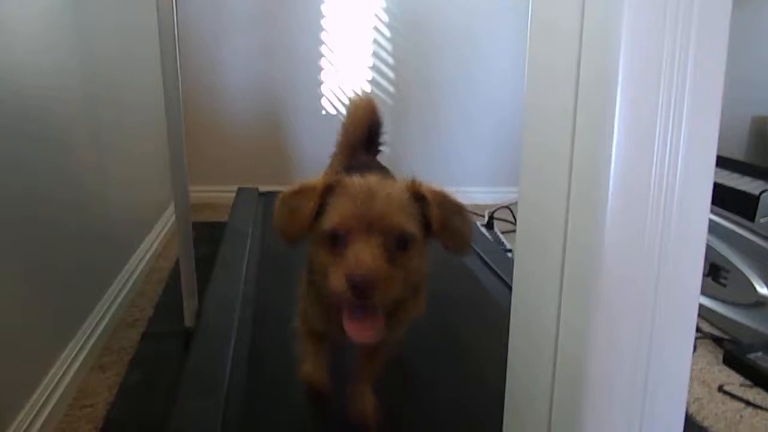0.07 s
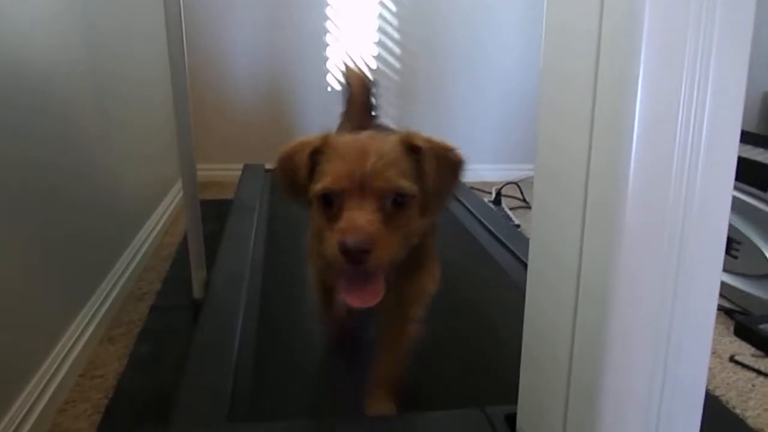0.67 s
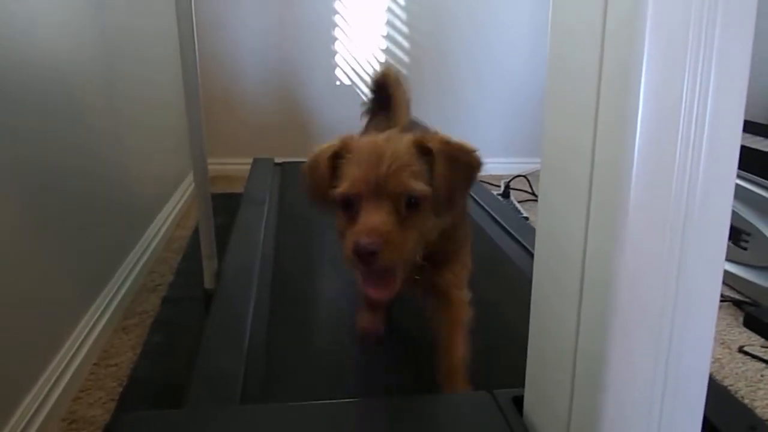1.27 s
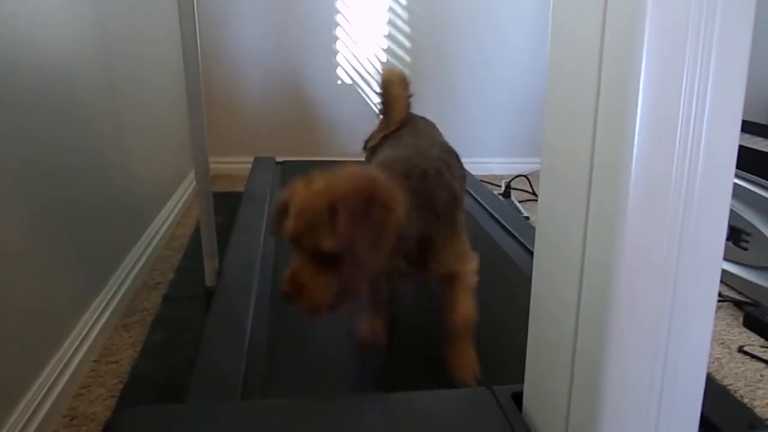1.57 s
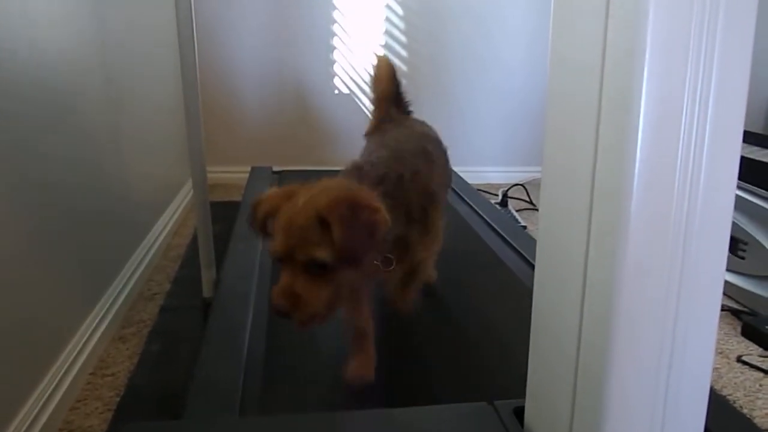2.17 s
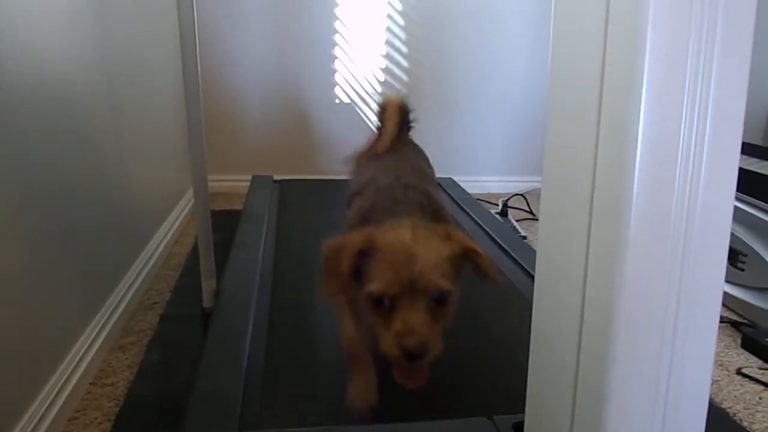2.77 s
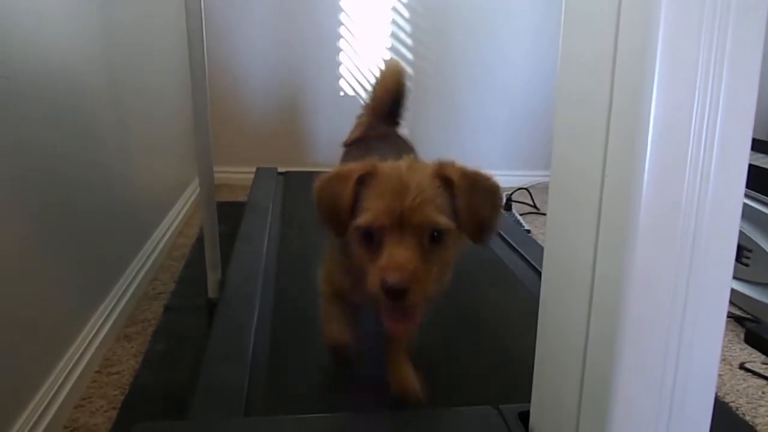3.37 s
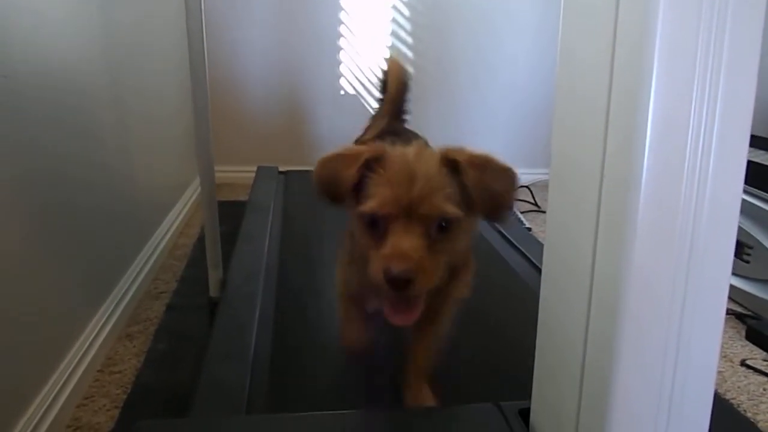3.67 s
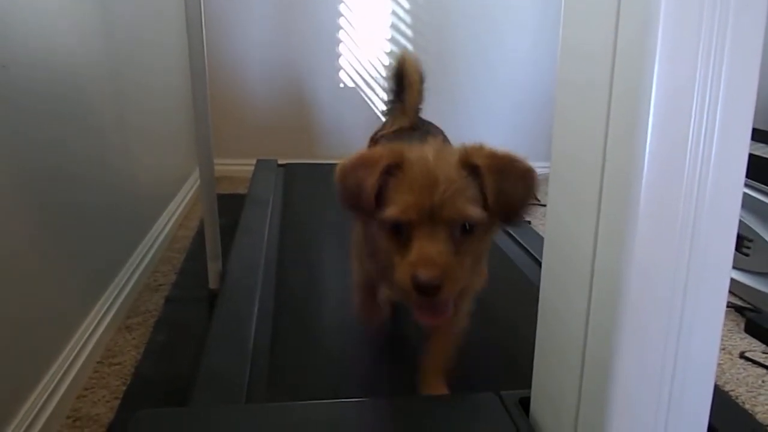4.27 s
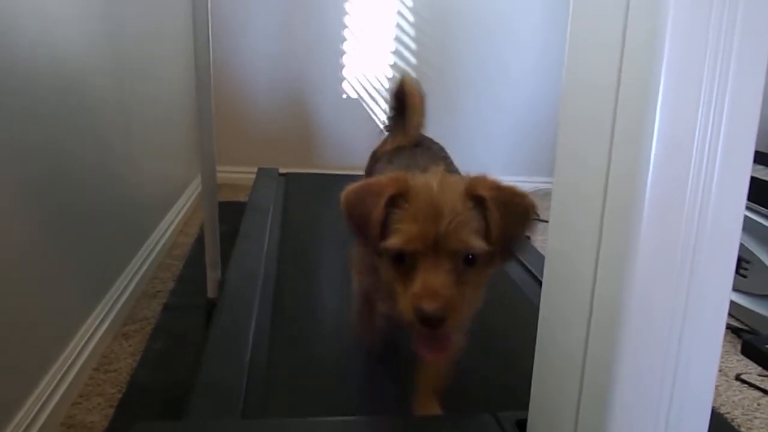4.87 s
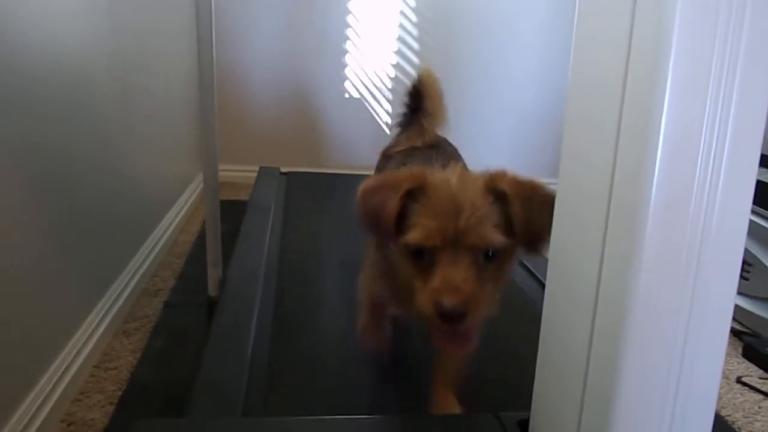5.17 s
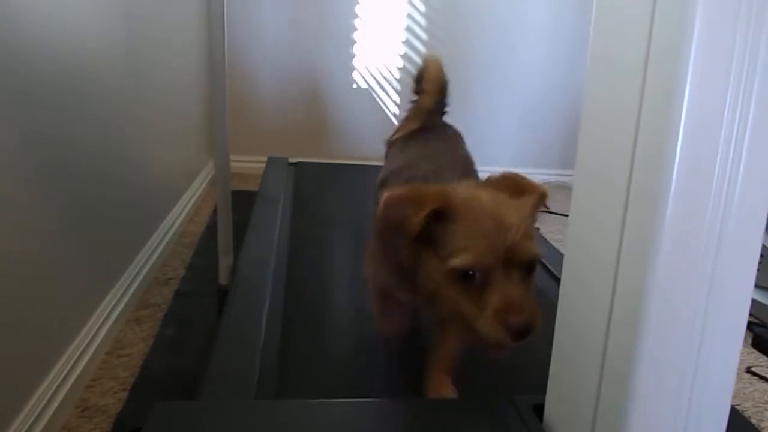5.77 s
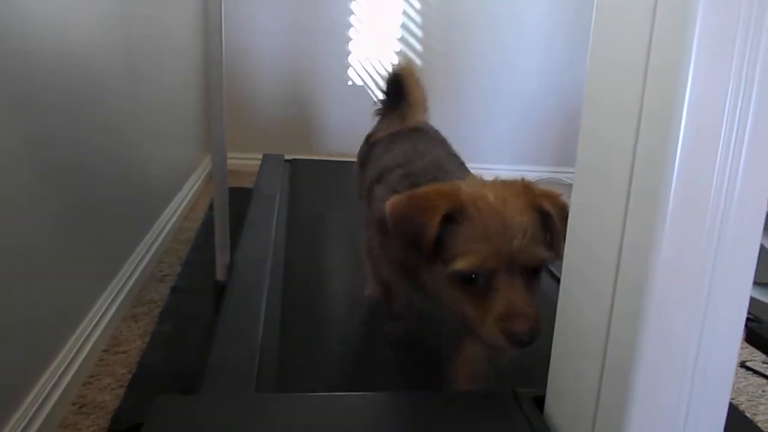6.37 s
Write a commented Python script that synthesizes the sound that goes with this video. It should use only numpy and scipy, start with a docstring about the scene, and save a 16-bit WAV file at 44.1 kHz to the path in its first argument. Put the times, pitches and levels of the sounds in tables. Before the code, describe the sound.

A small dog trots on a treadmill in the corner of a room, heard close up in stereo. The machine starts abruptly out of a short silence and runs steadily, with a low belt rumble, a motor hum, a hiss and a thin wavering whine. Light, slightly uneven paw pats, scuffs and claw ticks carry on throughout. Collar tags jingle at intervals, loudest near the end, and the deck thumps dully once midway and twice later.

```python
"""A small dog trots on a treadmill in a corner of a room, close to a stereo microphone.
After half a second of silence, the sound opens on the running machine: the belt rumbles over the deck,
the motor hums, its brushes hiss and its drive whines in step with the shaft. From then on paws pat and
scuff the belt, claws tick, and metal collar tags clink now and then. The deck gives a dull thump near
2.7 s and two more just after 5 s. The loudest clink comes near 6 s, shortly before the end."""
import sys
import numpy as np
from scipy import signal
from scipy.fft import rfft, irfft
from scipy.io import wavfile
from scipy.ndimage import uniform_filter1d, map_coordinates

SR = 44100
rng = np.random.default_rng(int(sys.argv[2]) if len(sys.argv) > 2 else 0)


def persist_wave(psi):
    """Save psi, clipped to +-1, as 16-bit WAV."""
    counts = np.round(np.clip(psi, -1, 1) * 32767).astype(np.int16)
    wavfile.write(sys.argv[1], SR, np.atleast_2d(counts).T)


N = 283122
SHAFT_HZ = 39.37  # turns of the motor shaft each second
FIRM_STEP_DB = -18  # lighter and heavier steps are compared with this weight


# Paws landing, about three a second with quicker steps between: start_s, weight_db
STEPS = [(.652, -18.5), (.972, -16.5), (1.285, -20), (1.41, -27), (1.965, -17.5), (2.312, -18.5),
         (2.44, -38), (2.622, -20), (2.802, -22), (2.985, -11.5), (3.142, -22), (3.312, -13.5), (3.44, -24),
         (3.63, -34), (3.795, -28), (3.945, -22), (4.25, -30), (4.562, -15.5), (4.878, -24), (5.17, -25),
         (5.516, -23), (5.686, -20), (6.039, -16), (6.197, -20)]
def paw_pats(first_pitch_hz=912.4, glide_s=0.036, rise_s=0.003, fade_s=0.01):
    """A landing pad sends a wave through the deck; its high part arrives first, so the pitch sinks."""
    pats, age = np.zeros(N), np.arange(SR // 10) / SR
    envelope = (1 - np.exp(-age / rise_s)) * np.exp(-age / fade_s)
    phase = 2 * np.pi * first_pitch_hz * glide_s * (1 - np.exp(-age / glide_s))
    wobble = .6 * wander(450)
    for start_s, weight_db in STEPS:
        start = int(start_s * SR)
        span = slice(start, start + len(age))
        pats[span] += np.sqrt(2) * undb(weight_db) * np.sin(phase + wobble[span]) * envelope
    return pan(echoes(pats, wet_db=-1.0, decay_s=0.043).mean(axis=0), left_db=1.5)


# Tone of a pad rubbing the belt: pitch_hz, level_db
SCUFF_TONE = [(50, -50), (150, -45), (300, -9.5), (480, -2.5), (700, 2), (900, 2.5), (1250, -5), (2000, -6),
              (3200, -20.5), (8000, -45)]
def paw_scuffs(firm_drag_db=-25.5, firm_half_s=0.023, lag_s=0.0011):
    """Each pad drags as it lands: briefly under a heavy step, longer and softer under a light one."""
    t, power = np.arange(N) / SR, np.zeros(N)
    for start_s, weight_db in STEPS:
        extra_db = weight_db - FIRM_STEP_DB
        half_s = firm_half_s * 2 ** (-extra_db / 33)  # 33 dB lighter drags twice as long
        peak = undb(firm_drag_db + 0.51 * extra_db)
        power += peak ** 2 / (1 + ((t - start_s - lag_s) / half_s) ** 2) ** 2
    rubbing = colour(noise() * grit(rate_hz=250, spread_db=3.0), SCUFF_TONE)
    return pan(rubbing * np.sqrt(power), left_db=0, delay_samples=2)


# Claws that strike the belt hard: start_s, level_db
HARD_CLAWS = [(0.888, -24), (1.061, -23.5), (1.208, -26.5), (1.565, -25), (1.765, -24), (2.269, -27),
              (2.433, -22.5), (2.563, -23.5), (2.778, -24), (2.907, -24.5), (3.238, -26), (3.543, -28),
              (3.86, -24), (4.166, -28), (4.471, -25.5), (4.779, -25), (4.946, -24.5), (5.07, -25),
              (5.352, -23)]
# Tone of a claw tick: pitch_hz, level_db
CLAW_TONE = [(60, -45), (300, -8), (1000, -2.5), (2600, 2.5), (4800, -3.5), (7000, -5), (11000, -7.5),
             (16000, -23)]
def claw_ticks(gain_db=1.0, early_s=.036, light_scrape_s=0.0023, hard_scrape_s=0.0031):
    """Claws tick lightly just before every pad, louder under more weight, and some strike hard."""
    light = [(s - early_s, -27 + 0.3 * (db - FIRM_STEP_DB), light_scrape_s) for s, db in STEPS]
    hard = [(s, db, hard_scrape_s) for s, db in HARD_CLAWS]
    scraping = colour(noise() * grit(rate_hz=2500, spread_db=2.0), CLAW_TONE)
    ticks = scraping * strikes(light + hard, fall_s=0.0021, room_db=0.5, room_s=0.021)
    return undb(gain_db) * pan(ticks, left_db=1.5)


# Collar tags knocking together: start_s, level_db, rattle_s, treble_limit_hz
TAG_CLASHES = [(.774, -22, .012, 10000), (1.897, -20, .003, 15000), (2.233, -19.5, .003, 15000),
               (2.748, -19, 0.0072, 14700), (3.411, -13, 0.0045, 9000), (3.84, -12.5, 0.006, 14000),
               (3.994, -17, 0.0026, 14000), (5.189, -14.5, 0.0053, 15000), (5.448, -12.5, 0.014, 15000),
               (6.07, -7, 0.0088, 13100), (6.264, -22.5, 0.0036, 13900)]
# Overall tone of a clash: pitch_hz, level_db
CLASH_TONE = [(80, -50), (1000, -6.5), (3500, -5.5), (5500, -6), (6600, -4), (8000, -3), (9700, -2.5),
              (12000, -2), (16000, -4)]
# Pitches at which the tags ring: pitch_hz, width_hz, boost_db
TAG_RINGS = [(4220, 93, 6), (5820, 280, -9.5), (5950, 130, 11.5), (6470, 120, 5), (7170, 320, 8),
             (8230, 95, 7), (9050, 200, 3), (9250, 300, 8.5), (9700, 200, 4), (10680, 220, 7),
             (11680, 210, 10), (13200, 190, 10)]
def tag_clashes(bounce_s=0.011, bounce_db=-15.5):
    """Metal tags chatter in a tight burst, then bounce back for a softer, longer rattle."""
    chatter = colour(noise() * grit(rate_hz=2500, spread_db=-2.0), CLASH_TONE, TAG_RINGS)
    clashes = np.zeros((2, N))
    for start_s, level_db, rattle_s, treble_limit_hz in TAG_CLASHES:
        treble_cut = signal.butter(3, treble_limit_hz, fs=SR, output="sos")
        # the tags meet at a new spot each time, so each clash rings a little differently
        metal = unit(echoes(chatter, wet_db=3, decay_s=.002))
        hit = (start_s, level_db, rattle_s)
        bounce = (start_s + bounce_s, level_db + bounce_db, 3.3 * rattle_s)
        envelope = strikes([hit, bounce], fall_s=0.0057, room_db=-8.0, room_s=0.038)
        clashes += signal.sosfilt(treble_cut, metal) * envelope
    return pan(clashes, left_db=3.5)


# Tags brushing edge to edge: start_s, top_note_db, lower_notes_db
TAG_PINGS = [(.775, -9, -25), (1.04, -28, -45), (2.37, -27, -50), (2.43, -24, -45), (3.16, -31, -48),
             (3.412, -24, -18.5), (3.731, -17, -27.5), (3.84, -25, -36), (4.007, -23, -34),
             (5.455, -29, -22)]
# The lower notes of a ping: pitch_hz, level_db
LOWER_NOTES = [(6600, 3), (8450, -5), (10420, -1.5)]
def tag_pings(top_hz=15025, touch_s=.004, swell_s=.003):
    """A tag grazed on its edge rings freely with a few high notes."""
    grazes = [(s, db, touch_s) for s, db, _ in TAG_PINGS]
    top_envelope = strikes(grazes, fall_s=0.0071, room_db=-12, room_s=0.029)
    top = tag_note(top_hz) * uniform_filter1d(top_envelope, int(swell_s * SR))
    taps = [(s, db) for s, _, db in TAG_PINGS]
    lower = sum(undb(db) * tag_note(hz) for hz, db in LOWER_NOTES)
    lower *= strikes(taps, fall_s=0.0091, room_db=-13, room_s=.035)
    return pan(undb(-1) * top + undb(-2) * lower, left_db=8, delay_samples=0)


def tag_note(pitch_hz):
    """One ringing note of a swinging tag, slightly blurred in pitch."""
    blur = np.array([wander(120), wander(99)])
    return np.sqrt(2) * np.sin(2 * np.pi * pitch_hz * np.arange(N) / SR + blur)


# Thumps through the deck, the board under the belt: start_s, level_db
THUMPS = [(2.745, -39), (5.18, -35), (5.412, -27)]
# Tone of a thump: pitch_hz, level_db
THUMP_TONE = [(25, -1), (70, -15), (130, -5), (300, 14), (500, -21), (1000, -18), (4000, -50)]
def deck_thumps(gain_db=-1):
    """Now and then the deck gives a dull thump."""
    envelope = strikes(THUMPS, fall_s=0.047, room_db=-4.5, room_s=0.067)
    return undb(gain_db) * colour(noise(), THUMP_TONE) * envelope


# Tone of the belt sliding over the deck: pitch_hz, level_db
BELT_TONE = [(25, -24), (65, -40), (100, -21), (155, -14), (205, 2), (300, -0.5), (410, -3.5), (620, -3),
             (830, -1.5), (1250, -8), (2500, -10.5), (4000, -11.5), (9000, -45)]
# Pitches that the deck and motor cover boost or weaken: pitch_hz, width_hz, boost_db
DECK_RINGS = [(128, 12, 5), (219, 14, 2), (238, 10, 3), (283, 12, 3), (316, 12, 4), (420, 20, -4),
              (443, 10, 5), (469, 10, 6), (522, 14, -8), (541, 10, 5), (618, 14, 5), (678, 14, 5),
              (1043, 12, 5), (1075, 20, -4), (1103, 22, 4)]
def belt_rumble(turns, rumble_db=-26.5, drone_hz=218.9, drone_db=-42, sway_db=1.17, throb_db=0.03):
    """The sliding belt rumbles, sets the deck droning and throbs very faintly with its roller."""
    throb = throb_db * np.cos(2 * np.pi * turns / 4)  # once in four shaft turns
    drone = np.sqrt(2) * np.sin(2 * np.pi * drone_hz * np.arange(N) / SR + .6 * wander(5))
    rumble = undb(rumble_db) * colour(noise(), BELT_TONE, DECK_RINGS) + undb(drone_db) * drone
    return pan(rumble, left_db=0.54, delay_samples=3) * undb(sway_db * wander(9) + throb)


# Tone of the brushes rubbing the motor's spinning contacts: pitch_hz, level_db
BRUSH_TONE = [(600, -52), (1500, -4.5), (2500, -1.5), (3300, 6.5), (4000, -7), (4500, 5.5), (4950, -2),
              (5350, 5.5), (6700, 4), (7700, 4), (10000, 0), (13000, -3.5), (16000, -3)]
def brush_hiss(turns, hiss_db=-28.0, repeat_share=0.29):
    """The brushes' hiss swells once, twice and eight times a turn; part of it repeats every turn."""
    angle = 2 * np.pi * turns
    swell_db = -1.44 * np.cos(angle) + 1.43 * np.cos(2 * angle) + 0.2 * np.cos(8 * angle)
    turn_samples = int(SR / SHAFT_HZ)
    place = turns % 1 * turn_samples
    roughness = rng.standard_normal((2, turn_samples))
    repeating = np.array([map_coordinates(row, [place], order=3, mode="grid-wrap") for row in roughness])
    scratch = np.sqrt(repeat_share) * repeating + np.sqrt(1 - repeat_share) * noise()
    force = undb(swell_db + .5 * wander(25)) * grit(rate_hz=750, spread_db=0.5)
    under_cover = echoes(scratch * force, wet_db=-15.5, decay_s=0.019)  # the motor cover reflects it
    return pan(colour(under_cover, BRUSH_TONE), left_db=2.5) * undb(hiss_db)


# Where the drive sings in each pair of shaft turns: middle_turns, half_length_turns, pitch_hz, level_db
SQUEAKS = [(0.129, 0.032, 3250, 7.5), (0.298, 0.1, 3010, 0), (.7, 0.074, 3000, 5),
           (1.138, 0.14, 3400, -2.5), (1.36, 0.19, 3052, 1), (1.69, 0.16, 2980, 8)]
def drive_whine(turns, whine_hz=3008, whine_db=-36.5):
    """The drive's whine swells and bends in pitch in a pattern that repeats every second turn."""
    phase = 2 * np.pi * whine_hz * turns / SHAFT_HZ + wander(5.5) + 0.54 * wander(40)
    whine = 0.18 * np.sin(phase)  # a quiet tone carries on between the squeaks
    for middle, half_length, pitch_hz, level_db in SQUEAKS:
        turns_since = (turns - middle + 1) % 2 - 1
        bend = 2 * np.pi * (pitch_hz - whine_hz) * turns_since / SHAFT_HZ
        swell = undb(level_db) * np.exp(-(turns_since / half_length) ** 2)
        whine += swell * np.sin(phase + bend + .5 * wander(25))
    wavering = unit(echoes(whine * undb(wander(20)), wet_db=-11, decay_s=.01))
    return pan(wavering, left_db=3.0, delay_samples=0) * undb(whine_db)


# The motor's tones: cycles_per_turn, level_db
MOTOR_TONES = [(20, -46), (39, -47), (46, -54), (48, -55), (49, -53), (58.5, -50), (67.5, -55), (70, -55),
               (84, -49), (88, -54), (89, -53), (93, -56), (97.5, -56), (136.5, -52), (149, -54),
               (160, -57), (168, -57), (176, -57), (184, -56)]
def motor_hum(turns):
    """Wavering tones follow the shaft; each reaches left and right a little out of step."""
    hum = np.zeros((2, N))
    for cycles, level_db in MOTOR_TONES:
        spread = min(cycles * SHAFT_HZ / 3000, 1) * np.pi / 4  # wider for higher tones, up to 3000 Hz
        offset = spread * rng.choice([-1, 1]) * np.array([[1], [-1]])
        loudness = np.sqrt(2) * undb(level_db + 2 * wander(12))
        hum += loudness * np.sin(2 * np.pi * cycles * turns + .7 * wander(16) + offset)
    return pan(hum, left_db=1.5, delay_samples=0)


def echoes(sound, wet_db, decay_s):
    """Nearby surfaces add quick echoes, different on the left and right."""
    size = SR // 4
    tail = rng.standard_normal((2, size)) * np.exp(-np.arange(size) / SR / decay_s)
    tail /= np.sqrt(np.sum(tail ** 2, axis=1, keepdims=True))
    return sound + undb(wet_db) * signal.fftconvolve(np.atleast_2d(sound), tail, axes=1)[:, :N]


def strikes(blows, fall_s, room_db, room_s):
    """Loudness of blows (start_s, level_db, optional hold_s): a quick fall plus the room's slower tail."""
    t, power = np.arange(N) / SR, np.zeros(N)
    for start_s, level_db, *hold_s in blows:
        span = slice(int(start_s * SR), int((start_s + .5) * SR))
        age = np.maximum(t[span] - start_s - sum(hold_s), 0)
        tail = undb(room_db) ** 2 * np.exp(-2 * age / room_s)
        power[span] += undb(level_db) ** 2 * (np.exp(-2 * age / fall_s) + tail)
    return np.sqrt(power)


def grit(rate_hz, spread_db):
    """The uneven force of many tiny contacts."""
    hold = max(int(SR / rate_hz), 1)
    forces = undb(spread_db * np.clip(rng.standard_normal(N // hold + 1), -2, 2))
    return unit(np.repeat(forces, hold)[:N])


def noise(apart_hz=2300, bass_side=0.0049):
    """Stereo noise: left and right are alike in the bass and unrelated in the treble."""
    hz = np.arange(N // 2 + 1) * SR / N
    mid, side = rfft(rng.standard_normal((2, N)))
    share = np.minimum(bass_side + (hz / apart_hz) ** 2 / np.sqrt(1 + (hz / apart_hz) ** 4), 1)
    return unit(irfft((mid + np.array([[1], [-1]]) * share * side) / np.sqrt(1 + share ** 2), N))


def colour(sound, tone, rings=()):
    """Shape a sound with a smooth tone curve and narrow peaks or dips; its strength comes out as 1."""
    hz = np.arange(N // 2 + 1) * SR / N + 1e-3
    pitch_hz, level_db = np.transpose(tone)
    curve_db = np.interp(np.log(hz), np.log(pitch_hz), level_db)
    for centre_hz, width_hz, boost_db in rings:
        curve_db += boost_db / (1 + (2 * (hz - centre_hz) / width_hz) ** 2)
    return unit(irfft(rfft(sound) * undb(curve_db), N))


def wander(rate_hz):
    """A smooth random drift, about 1 in size."""
    hold = int(SR / rate_hz)
    jumps = np.repeat(rng.standard_normal(N // hold + 1), hold)
    return unit(uniform_filter1d(uniform_filter1d(jumps, hold), hold)[:N])


def pan(sound, left_db, delay_samples=4):
    """Lean a sound to the left: louder there, and later on the right."""
    left, right = sound * undb(np.array([[left_db], [-left_db]]) / 2)
    return np.array([left, np.roll(right, delay_samples)])


def undb(db):
    """Turn decibels into a multiplier."""
    return 10 ** (np.asarray(db) / 20)


def unit(sound):
    """Scale to an average strength (rms) of 1."""
    return sound / np.sqrt(np.mean(sound ** 2))


def scene():
    """One shaft, nearly steady in speed, drives the whole machine; the dog trots on top."""
    turns = np.cumsum(SHAFT_HZ + .04 * wander(3)) / SR - .3  # running count of shaft turns
    treadmill = belt_rumble(turns) + brush_hiss(turns) + motor_hum(turns) + drive_whine(turns)
    footfalls = paw_scuffs() + paw_pats() + deck_thumps() + claw_ticks()
    return treadmill + footfalls + tag_clashes() + tag_pings()


def record(dry, opens_s=.573, bass_limit_hz=85, treble_limit_hz=15750):
    """The microphone opens abruptly and loses the deep bass and the highest treble."""
    thin = signal.sosfilt(signal.butter(2, bass_limit_hz, "highpass", fs=SR, output="sos"), dry)
    live = np.clip(thin, -1, 1) * (np.arange(N) / SR >= opens_s)
    return signal.sosfilt(signal.ellip(10, .2, 70, treble_limit_hz, fs=SR, output="sos"), live)


dry = scene()
out = record(dry)
persist_wave(out)
```